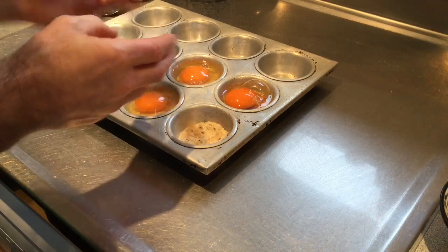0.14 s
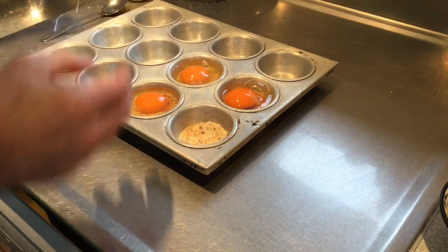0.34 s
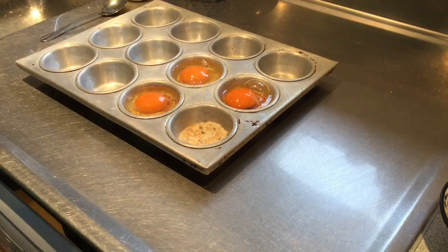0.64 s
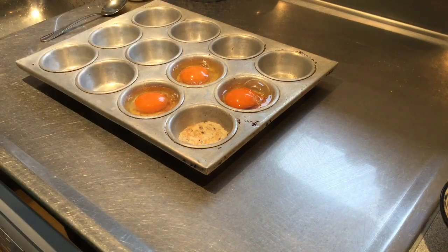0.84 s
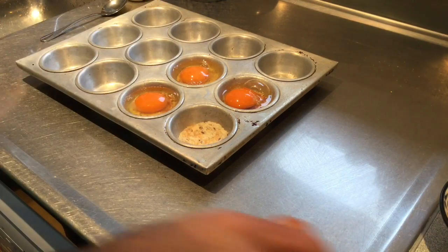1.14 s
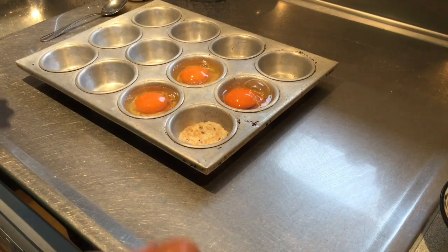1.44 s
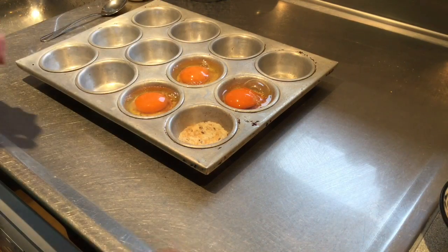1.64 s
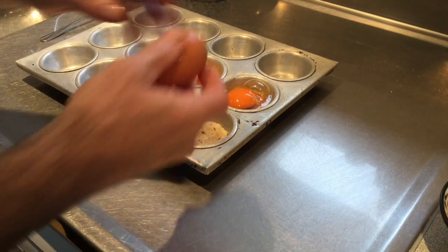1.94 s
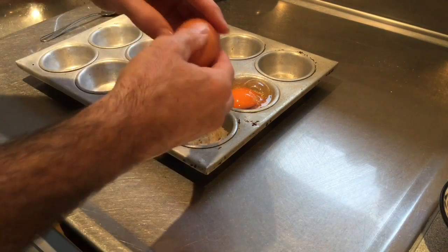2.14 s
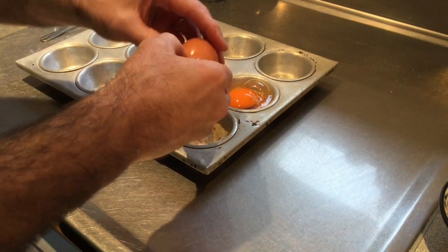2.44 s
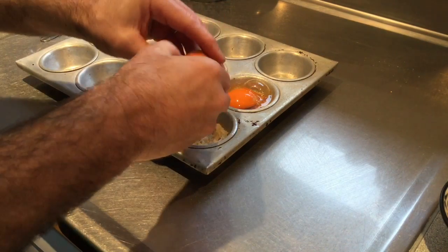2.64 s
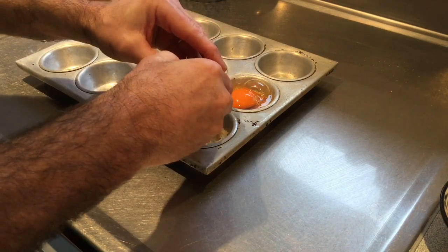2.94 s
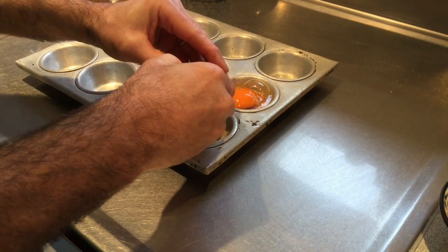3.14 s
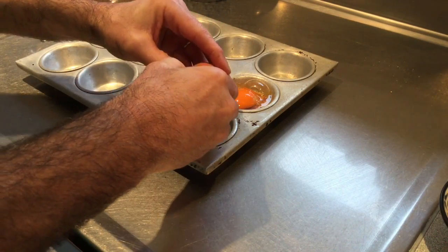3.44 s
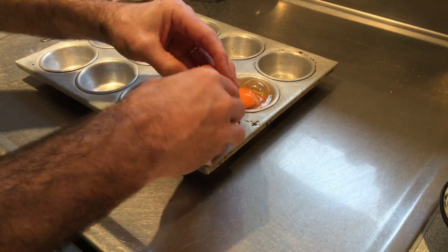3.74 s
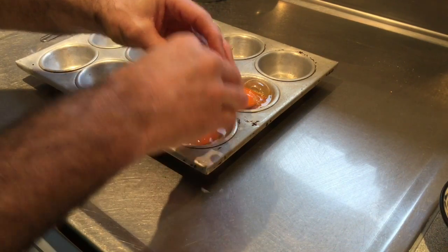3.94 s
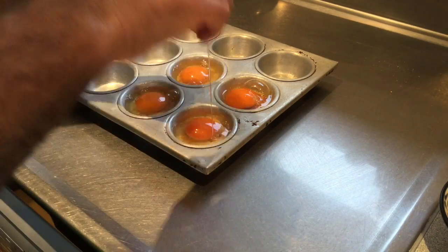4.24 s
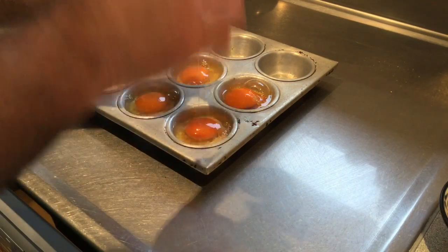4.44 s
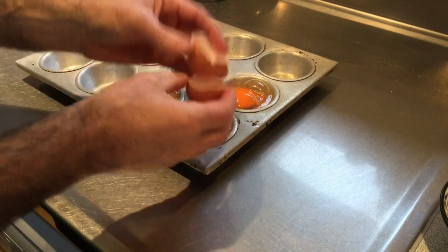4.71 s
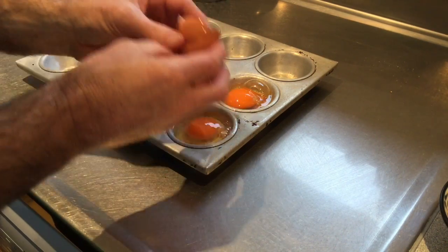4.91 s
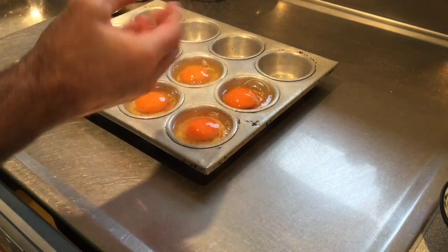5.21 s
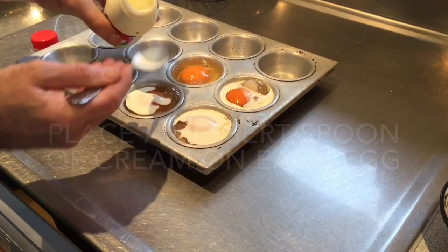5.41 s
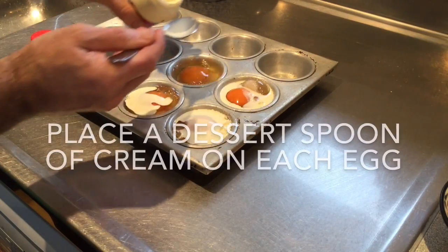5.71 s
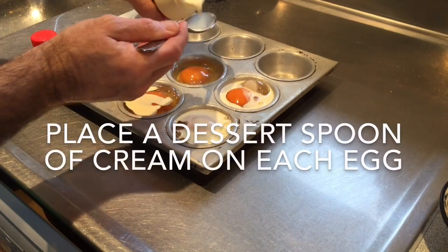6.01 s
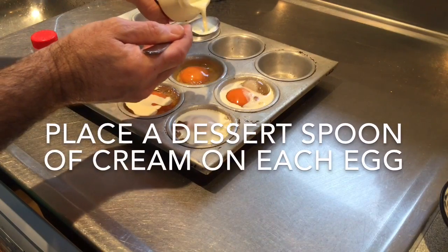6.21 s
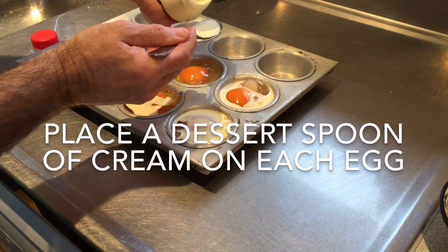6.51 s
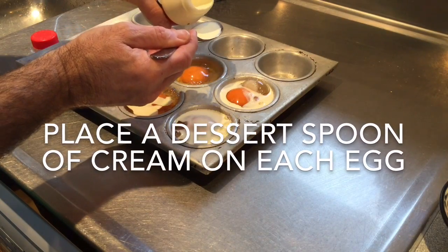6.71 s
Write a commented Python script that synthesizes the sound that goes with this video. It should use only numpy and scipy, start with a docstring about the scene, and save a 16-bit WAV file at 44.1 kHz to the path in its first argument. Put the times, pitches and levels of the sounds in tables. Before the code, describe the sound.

Over a low appliance hum in a hard kitchen, a tossed shell bounces, two egg knocks boom, and brittle shell crackles apart.

```python
"""In a hard kitchen, eggs are broken over a muffin tin on a steel bench.
An empty shell is tossed aside, bounces and rolls; an egg is knocked twice on the bench,
and its shell is prised open and crushed. Breaks are bursts of noise snaps, struck things are fading modes,
and delayed fading noise is the echo. An appliance hums below; late on, the level dips briefly to silence."""
import sys
import numpy as np
from scipy import signal
from scipy.fft import rfft, irfft
from scipy.io import wavfile

SR = 44100
rng = np.random.default_rng(int(sys.argv[2]) if len(sys.argv) > 2 else 0)


def log_audio(samples):
    """Write samples as a 16-bit WAV file to the path given in sys.argv[1]."""
    # one column per channel
    frames = np.atleast_2d(samples).T
    # limit to full scale, then quantise
    limited = np.clip(frames, -1, 1)
    pcm = np.round(limited * 32767).astype(np.int16)
    wavfile.write(sys.argv[1], SR, pcm)


N = 302702

# In the tables, "relative" levels only compare entries: the functions add a gain or even out the total.
# shell fractures: (time [s], relative crack [dB], relative hollow ring [dB], relative dull knock [dB],
#                   chip pitch [Hz], hollow pitch [Hz])
FRACTURES = [(0.0189, -49, -54, -71, 5870, 2040), (0.612, -48, -60.5, -47, 6470, 2750),
             (0.756, -50, -63, -86, 6840, 2700), (2.2545, -55.5, -67.5, -62, 8610, 1600),
             (2.41, -43.5, -58.5, -60, 8260, 1960), (2.4416, -39, -56.5, -38.5, 5560, 1910),
             (2.5509, -47, -54.5, -62, 8830, 2010), (2.5836, -48, -83, -68, 9820, 1870),
             (2.595, -50.5, -78, -71, 9600, 1900), (2.6091, -49, -82, -74, 9340, 1940),
             (2.9504, -49, -69, -54, 8060, 2160), (2.9756, -24, -44.5, -33, 13660, 1980),
             (3.2036, -43.5, -65.5, -67.5, 11000, 2476), (3.5187, -40, -62.5, -70.5, 8120, 1950),
             (3.5476, -42.5, -60.5, -47, 7840, 2050), (3.5755, -34, -52, -60, 5140, 2020),
             (3.5901, -26, -36.5, -75, 8850, 2030), (3.6064, -38, -58, -66, 9300, 2000),
             (3.6267, -30.5, -50, -67, 11400, 1660), (3.635, -47, -57, -68, 9320, 2070),
             (3.695, -20.5, -45, -48, 4470, 2030), (3.7789, -41, -57.5, -64, 4740, 1690),
             (3.9834, -53, -52.5, -64, 9500, 2260), (4.015, -40, -51, -70, 5150, 2370),
             (4.0248, -49, -49, -75, 9200, 1855), (4.2562, -59, -64, -64, 6580, 1960),
             (4.3121, -53.5, -54, -68, 6300, 1970), (4.473, -65, -59.5, -69, 4370, 1720),
             (4.586, -56, -69, -63.5, 11200, 2260), (4.6433, -54.5, -80, -63, 13650, 2120),
             (4.789, -23.5, -35, -77, 6230, 2404), (4.796, -23.5, -41, -79, 9600, 2230),
             (4.8046, -31, -36, -79, 9700, 2250), (4.823, -36, -57, -67, 5940, 2420),
             (4.843, -38, -58, -73, 9720, 2204), (4.8593, -27.5, -46, -79, 8360, 2060),
             (4.8762, -58, -56, -76, 8600, 2620), (4.9137, -42, -49.5, -78, 8300, 1840),
             (4.9238, -31.5, -57, -75, 8400, 2600)]
# tossed shell landing and bouncing: (time [s], relative strength [dB], relative crack [dB],
#                                     relative dull knock [dB], rattle decay [ms], knock pitch [Hz])
BOUNCES = [(0.828, -11.5, -18.5, -41, 7.7, 1100), (0.8386, -13.5, -23.5, -36, 4.2, 1290),
           (0.858, -27.5, -34.5, -37.5, 8, 345), (0.885, -17, -27, -20, 8, 1050),
           (0.901, -34.5, -30, -38, 4.1, 800), (.973, -27.5, -35, -13, 14, 497)]
# clear modes of the vessel that catches the shell: (pitch [Hz], relative level [dB], time to fall 60 dB [s])
VESSEL_MODES = [(345, -7, 0.96), (700, -11.5, 0.39), (1034, -8, .5), (1390, -10, 0.14), (1427, -19.5, 0.18),
                (1870, -22.5, .15), (2137, 1, .3), (2410, -11, 0.35), (3790, -6, 0.096),
                (4350, -8.5, 0.046)]
# dense ringing of that vessel: (pitch [Hz], relative level per Hz [dB])
VESSEL_COLOUR = [(150, -5), (350, -13), (600, -19), (1100, -6.5), (2100, -10), (3000, -14.5), (5000, -14.5)]
# how long it rings: (pitch [Hz], time to fall 60 dB [s])
VESSEL_T60 = [(150, 0.52), (600, 0.8), (2000, .5), (5000, 0.36)]
# egg against the bench: (time [s], relative strength [dB], relative crack [dB], relative boom [dB],
#                         break decay [ms], relative deep thump [dB])
BENCH_KNOCKS = [(1.459, -9, -11, -17, 12, -54), (1.694, -11, -9.5, -23.5, 4.4, -37)]
# clear modes of the steel bench: (pitch [Hz], relative level [dB], time to fall 60 dB [s])
BENCH_MODES = [(106.2, -8.5, 0.5), (207.3, -7.5, 0.8), (345, 6.5, 0.087), (535, -14.5, 0.13),
               (625, -7.5, 0.23), (652, -9.5, 0.49), (976, -6, 0.068), (1350, -9.5, 0.11), (2510, 4, .02)]
# dense ringing of the bench: (pitch [Hz], relative level per Hz [dB])
BENCH_TONE_COLOUR = [(250, -0.5), (400, -15), (1000, 10), (1500, -9.5), (2500, -16), (5000, -17.5)]
# how long it rings: (pitch [Hz], time to fall 60 dB [s])
BENCH_RING_T60 = [(300, 0.083), (1000, 0.03), (2500, 0.13), (5000, 0.04096)]
# cupboards under the bench: (pitch [Hz], relative level per Hz [dB])
CUPBOARD_COLOUR = [(70, -24), (115, 9), (200, 1.5), (340, -1), (500, -2)]
# how long they boom: (pitch [Hz], time to fall 60 dB [s])
CUPBOARD_T60 = [(40, 0.71), (120, 0.63), (400, 0.3)]
# modes of a half shell: (share of its hollow pitch, relative level [dB], time to fall 60 dB [s])
HALF_SHELL_MODES = [(0.852, -4, .012), (0.998, 6.5, .02), (1.1, -6.5, .015), (1.25, -17.5, .012)]
# kitchen echo, before its extra fall-off: (pitch [Hz], time to fall 60 dB [s])
ECHO_T60 = [(200, 0.94), (1000, 1), (3000, 0.69), (8000, 0.55), (15000, 0.37)]
# colour of the echo: (pitch [Hz], relative level per Hz [dB])
ECHO_COLOUR = [(200, 7.5), (1000, -2), (3000, -1), (5000, -1), (8000, -2), (11000, 1), (15000, 0)]
# room air: (pitch [Hz], relative level per Hz [dB])
AIR_COLOUR = [(18, -54), (30, -19), (102, -6), (168, -12), (198, -12), (408, -24), (447, -19.5),
              (473, -21.5), (903, -32.5), (1050, -29.5), (2500, -36.5), (3250, -67), (5500, -120)]
# faint treble of the air: (pitch [Hz], relative level per Hz [dB])
AIR_TOP_COLOUR = [(1470, -29), (2500, -3.5), (4500, -12.5), (4930, -12), (5880, -14.5), (14300, -18.5),
                  (15500, -29.5)]
# narrow noise bands of the appliance: (centre [Hz], width [Hz], level [dB])
HUM_BANDS = [(102, 29, -62.5), (321, 46, -74.5), (425.5, 17, -78), (1044, 44, -77), (1290, 20, -90),
             (1570, 64, -89.5)]
# thin metal left ringing by the clatter: (start [s], stop [s], pitch [Hz], level [dB], time to fall 60 dB [s])
METAL_PARTIALS = [(1.015, 1.27, 2299, -44, .8), (1.015, 1.2, 2325, -53, .5), (.985, 1.1, 5200, -65, .6),
                  (.985, 1.1, 5240, -67, .6)]
# skin rubbing on shell: (start [s], length [s], relative hiss [dB], relative rustle [dB])
RUB_STROKES = [(0, 0.046, -68, -65.5), (1.415, 0.094, -55.5, -56.5), (3.9, .15, -89, -76)]
# dented shell of the whole egg: (pitch [Hz], level over the crack [dB])
DENT_CHIPS = [(6300, 2), (8800, -2.5)]

DRONE_HZ, DRONE_DB = 105.4, -64.5   # steady core of the hum, rms level
AIR_DB, AIR_TOP_DB = -60.5, -79.5
HANDS_DB, HANDS_STILL_S = -84.5, 5.4   # relative level; hands stir until then
RUB_EDGE_S, RUB_HZ = 0.011, 9200   # soft edge of a stroke, pitch its hiss leans on
SPLINTER_MS, SPLINTER_MS_PER_DB = 3.2, .07   # decay of a break with -45 dB crack; stronger ones last longer
SNAP_TOP_HZ = 17000
CHIP_DB, CRUMB_DB = 9.5, -0.5   # loose chip, and two crumbs of chance pitch, over the snap
ROLL_START_S, ROLL_STOP_S, ROLL_DB, ROLL_LOSS_DB_PER_S = 0.84, 1.35, -49.5, 15
ROLL_TOUCHES_PER_S, ROLL_TOP_HZ = 230, 1600
DIP_S, DIP_HALF_S = 5.427, .022   # middle of the silent dip; time to fall, and to come back
CUTOFF_HZ = 15800


def from_db(db):
    """Gain of a level in dB."""
    return 10 ** (np.asarray(db) / 20)


def rms_one(x):
    """Scale a sound to an rms (average strength) of 1."""
    return x / np.sqrt(np.mean(x ** 2) + 1e-20)


def energy_one(x):
    """Scale a sound so its squares add up to 1."""
    return x / np.sqrt(np.sum(x ** 2))


def at_hz(points, hz):
    """Read a table between its points, with pitch on a log scale."""
    points = np.array(points)
    return np.interp(np.log(hz), np.log(points[:, 0]), points[:, 1])


def band(x, low_hz, high_hz):
    """Keep only the pitches between two limits."""
    edges = [low_hz, min(high_hz, .45 * SR)]
    return signal.sosfilt(signal.butter(2, edges, "band", fs=SR, output="sos"), x)


def peak_at(x, hz, sharpness):
    """Bring out one pitch, as a small resonance does."""
    return signal.lfilter(*signal.iirpeak(hz, sharpness, SR), x)


def coloured(spectrum, size):
    """Noise following a spectrum table, silent outside it; rms 1."""
    hz = np.arange(1, size // 2 + 2) * SR / size
    inside = (hz > spectrum[0][0]) & (hz < spectrum[-1][0])
    white = rfft(rng.standard_normal(size))
    return rms_one(irfft(white * from_db(at_hz(spectrum, hz)) * inside, size))


def dense_response(spectrum, t60s):
    """Countless close modes: noise whose third-octave bands each die at their own pace; energy 1."""
    t = np.arange(SR) / SR
    edges = 25 * 2 ** np.arange(0, 9.5, 1 / 3)
    noise = [coloured(spectrum, SR), coloured(spectrum, SR)]   # neighbouring bands get unrelated noise
    out = np.zeros(SR)
    for k, (low, high) in enumerate(zip(edges, edges[1:])):
        t60 = at_hz(t60s, np.sqrt(low * high))
        out += band(noise[k % 2], low, high) * from_db(-60 * t / t60)
    return energy_one(out)


def mode_response(modes, scatter_db):
    """A few clear modes, each a fading sine with chance strength around its level; energy 1."""
    t = np.arange(SR) / SR
    out = np.zeros(SR)
    for hz, db, t60 in modes:
        struck_db = db + scatter_db * rng.standard_normal()
        out += from_db(struck_db - 60 * t / t60) * np.sin(2 * np.pi * hz * t)
    return energy_one(out)


def half_shell(hz):
    """Air and wall of a cupped half shell ring together in a few short modes."""
    return mode_response([(share * hz, db, t60) for share, db, t60 in HALF_SHELL_MODES], 2.7)[:SR // 10]


def splinters(ms, uneven_db=8.0, rise_ms=1.0):
    """A brittle break: row 0 the swarm of snaps heard directly, row 1 one click of equal energy for the walls."""
    t = np.arange(SR // 12) / SR
    strength_db = uneven_db * np.repeat(rng.standard_normal(len(t)), 12)[:len(t)]   # new every 12 samples
    snaps = rng.standard_normal(len(t)) * from_db(strength_db)
    swarm = snaps * np.exp(-1000 * t / max(ms, .3)) * (1 - np.exp(-1000 * t / rise_ms))
    return np.stack([energy_one(swarm), t == 0])


def evened(rows):
    """Give row 0 the energy of row 1."""
    energy = np.sum(rows ** 2, axis=1, keepdims=True)
    return rows * np.sqrt(energy[1] / energy)


def snaps_in(swarm, low_hz, high_hz):
    """One band of a break, as strong heard directly as at the walls."""
    return evened(band(swarm, low_hz, high_hz))


def through(sound, response):
    """A sound played through a body's response."""
    return evened(signal.fftconvolve(sound, response[None], axes=1))


def ringing(snap, hz):
    """A loose bit of shell rings at one pitch."""
    return evened(peak_at(snap, hz, 13.0))


def close_by(response, walls_db):
    """A sound heard directly, and more weakly by way of the walls."""
    return response * from_db([[0], [walls_db]])


def add(out, s, sound):
    """Mix a sound in at a time in seconds."""
    i = round(s * SR)
    out[:, i:i + sound.shape[-1]] += sound[..., :N - i]


def held(start, stop, edge):
    """Gain 1 between two times, with soft edges."""
    t = np.arange(N) / SR
    return np.clip(np.minimum(t - start, stop - t) / edge + .5, 0, 1)


def room_air():
    """Steady room air: mostly low noise, with a faint treble."""
    return from_db(AIR_DB) * coloured(AIR_COLOUR, N) + from_db(AIR_TOP_DB) * coloured(AIR_TOP_COLOUR, N)


def hum():
    """Appliance motor drone: a steady tone inside noise through narrow bands."""
    out = from_db(DRONE_DB) * np.sqrt(2) * np.sin(2 * np.pi * DRONE_HZ * np.arange(N) / SR)
    for hz, width, db in HUM_BANDS:
        out += from_db(db) * rms_one(band(rng.standard_normal(N), hz - width / 2, hz + width / 2))
    return out


def handling(per_s=40, tick_db=14):
    """Skin and shell rub: soft bright noise that swells at scattered tiny ticks."""
    ticks = (rng.random(N) < per_s / SR) * rng.exponential(1, N)
    grain = 1 + from_db(tick_db) * signal.lfilter([1], [1, -.985], ticks) / 4   # each tick fades smoothly
    return grain * rms_one(band(rng.standard_normal(N), 3100, 21000))


def rubs():
    """Brief strokes of bright hiss and duller rustle over the faint stirring of the hands."""
    hiss = handling()
    rustle = rms_one(band(rng.standard_normal(N), 500, 2800))
    bright = hiss + peak_at(hiss, RUB_HZ, 5.0) * from_db(-1.5)
    out = from_db(HANDS_DB) * held(-1, HANDS_STILL_S, .05) * hiss
    for s, length, hiss_db, rustle_db in RUB_STROKES:
        stroke = from_db(hiss_db) * bright + from_db(rustle_db) * rustle
        out += held(s, s + length, RUB_EDGE_S) * stroke
    return out


def shell_fractures():
    """Each fracture: a bright snap, the ring of the hollow half shell and a dull knock in the fingers."""
    out = np.zeros((2, N))
    for s, crack_db, ring_db, knock_db, chip_hz, hollow_hz in FRACTURES:
        swarm = splinters(SPLINTER_MS + SPLINTER_MS_PER_DB * (crack_db + 45))
        snap = snaps_in(band(swarm, 3300, SNAP_TOP_HZ), 3700, SNAP_TOP_HZ)
        chip = from_db(CHIP_DB) * ringing(snap, chip_hz)
        crumbs = from_db(CRUMB_DB) * sum(ringing(snap, hz) for hz in rng.uniform(4000, 11000, size=2))
        ring = through(band(swarm, 1200, 4000), half_shell(hollow_hz))
        knock = snaps_in(swarm, 400, 1400)
        add(out, s, from_db(crack_db + 7.5) * (snap + chip + crumbs))
        add(out, s, from_db(ring_db + 20.5) * close_by(ring, -1))
        add(out, s, from_db(knock_db + 24) * close_by(knock, -5.5))
    return out


def roll():
    """Dense soft touches of the rolling shell excite the vessel, weaker as it slows."""
    touches = (rng.random(N) < ROLL_TOUCHES_PER_S / SR) * rng.standard_normal(N)
    body = dense_response(VESSEL_COLOUR, VESSEL_T60)[:SR // 20]
    rumble = rms_one(band(signal.fftconvolve(touches, body)[:N], 250, ROLL_TOP_HZ))
    slowing_db = -ROLL_LOSS_DB_PER_S * np.clip(np.arange(N) / SR - ROLL_START_S, 0, 1)
    return from_db(ROLL_DB + slowing_db) * held(ROLL_START_S, ROLL_STOP_S, .1) * rumble


def toss():
    """The empty shell rattles into a vessel, whose dense and clear modes ring on."""
    out = np.zeros((2, N))
    for s, strength_db, crack_db, knock_db, ms, knock_hz in BOUNCES:
        swarm = splinters(ms)
        clatter = dense_response(VESSEL_COLOUR, VESSEL_T60)
        ring = mode_response(VESSEL_MODES, 0.67)
        hollow = snaps_in(swarm, 1700, 2450)   # of the half shell
        knock = snaps_in(swarm, knock_hz / 2.1, knock_hz * 1.3)
        add(out, s, from_db(strength_db + 12.5) * close_by(clatter, -9.0))
        add(out, s, from_db(strength_db + 11.0) * close_by(ring, -10.5))
        add(out, s, from_db(strength_db + 30) * close_by(hollow, -5.5))
        add(out, s, from_db(crack_db + 23.5) * close_by(snaps_in(swarm, 3900, 4450), -10.0))
        add(out, s, from_db(crack_db + 20.5) * snaps_in(swarm, 3000, 16000))
        add(out, s, from_db(knock_db + 27.0) * close_by(knock, -8.5))
    return out


def chink():
    """Thin metal rings on: each partial swells in over 11 ms and is damped over its last 25 ms."""
    out = np.zeros(N)
    for start, stop, hz, db, t60 in METAL_PARTIALS:
        t = np.clip(np.arange(N) / SR - start, 0, None)
        swell = np.minimum(t / 0.011, 1)
        damping = np.clip((stop - start - t) / 0.025, 0, 1)
        out += damping * swell * from_db(db - 60 * t / t60) * np.sin(2 * np.pi * hz * t)
    return out


def knocks():
    """The egg hits the bench: the shell gives way, the steel sheet rings and the cupboards boom."""
    out = np.zeros((2, N))
    for s, strength_db, crack_db, boom_db, ms, thump_db in BENCH_KNOCKS:
        swarm = splinters(ms)
        sheet = dense_response(BENCH_TONE_COLOUR, BENCH_RING_T60)
        ring = mode_response(BENCH_MODES, 1.9)
        full_egg = snaps_in(swarm, 850, 1500)
        crack = snaps_in(swarm, 2100, 18000)
        chips = sum(from_db(db) * ringing(crack, hz) for hz, db in DENT_CHIPS)
        boom = dense_response(CUPBOARD_COLOUR, CUPBOARD_T60)
        thump = mode_response([(48.2, 1.5, 0.44), (61.6, -8.0, 0.28)], 0)
        add(out, s, from_db(strength_db + 13) * close_by(sheet, -2))
        add(out, s + .003, from_db(strength_db + 11.5) * close_by(ring, -11.0))
        add(out, s, from_db(strength_db + 9.0) * snaps_in(swarm, 250, 4900))
        add(out, s + 0.0014, from_db(strength_db + 15.5) * close_by(full_egg, -6))
        add(out, s, from_db(crack_db + 11) * (crack + chips))
        add(out, s + .004, from_db(boom_db + 19.5) * close_by(boom, -11.0))
        add(out, s + 0.0093, from_db(thump_db + 29.0) * close_by(thump, -10.5))
    return out


def kitchen(to_walls, build_up_ms=12, fall_off_s=0.19):
    """First walls answer after 5 ms; the echoes thicken, die by band and fall off faster towards their end."""
    t = np.arange(SR) / SR
    shape = (1 - 0.2 * np.exp(-1000 * t / build_up_ms)) * np.exp(-(t / fall_off_s) ** 2)
    echo = signal.fftconvolve(to_walls, shape * dense_response(ECHO_COLOUR, ECHO_T60))
    return np.pad(echo, (SR // 200, 0))[:N]


def level_dip():
    """The level falls briefly to silence and comes back."""
    return np.minimum(np.abs(np.arange(N) / SR - DIP_S) / DIP_HALF_S, 1) ** 1.5


def scene():
    """Near sounds with their kitchen echo over the steady background."""
    events = shell_fractures() + toss() + knocks()
    near, to_walls = events + close_by(chink(), -10.5) + close_by(roll(), -31.5)
    near = near + from_db(-6.5) * kitchen(to_walls) + rubs()
    return ((near + room_air() + hum()) * level_dip())[None]


def record(dry):
    """The small microphone drops the deepest bass; the top is cut."""
    thin = signal.sosfilt(signal.butter(4, 38, "high", fs=SR, output="sos"), dry)
    return signal.sosfilt(signal.cheby2(14, 60, CUTOFF_HZ, fs=SR, output="sos"), thin)


dry = scene()
out = record(dry)
log_audio(out)
```